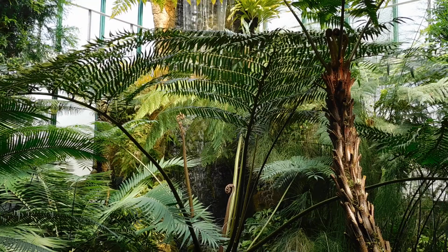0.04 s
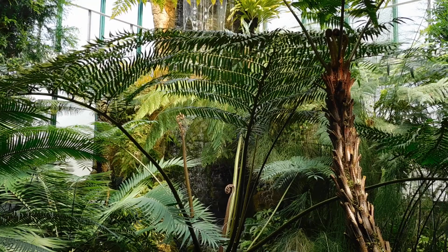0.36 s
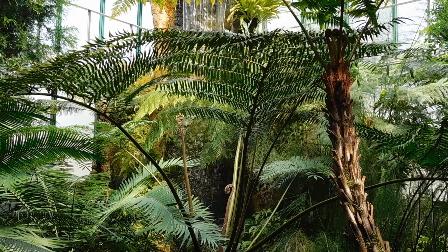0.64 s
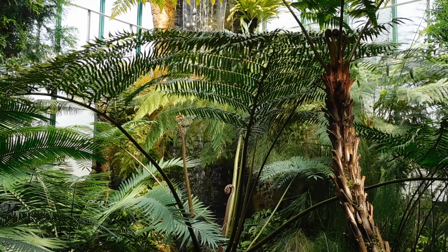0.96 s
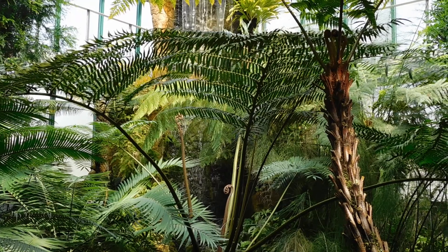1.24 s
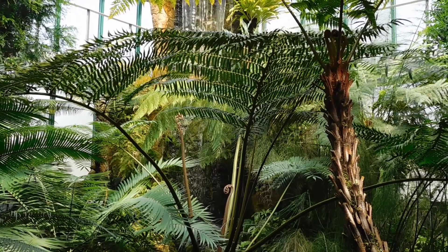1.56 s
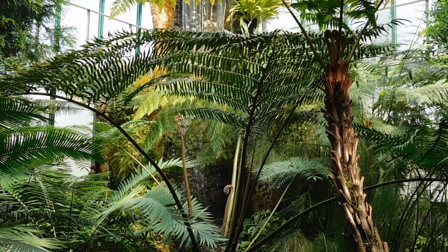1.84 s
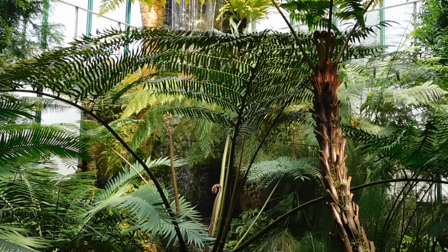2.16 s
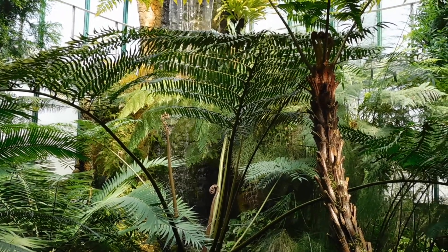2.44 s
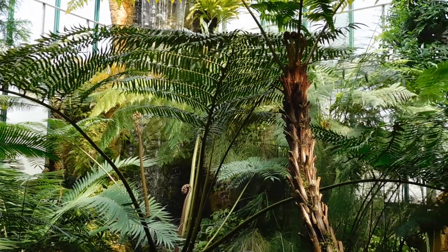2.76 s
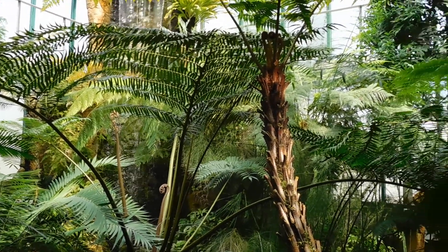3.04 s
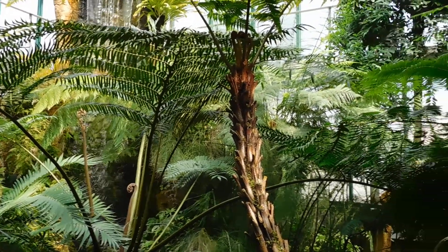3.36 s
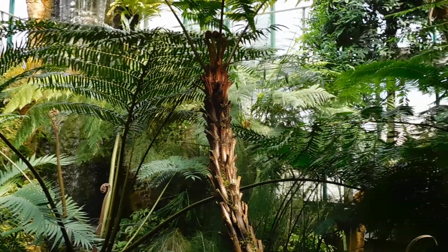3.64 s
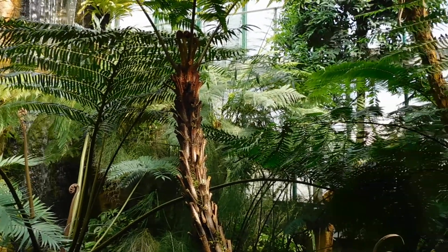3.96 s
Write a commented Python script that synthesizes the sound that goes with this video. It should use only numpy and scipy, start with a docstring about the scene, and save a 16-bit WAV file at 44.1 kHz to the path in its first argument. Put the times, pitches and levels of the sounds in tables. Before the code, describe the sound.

Falling water makes a constant, even rush in a plant-filled greenhouse, topped by a hiss of spray. Small bubbles and drops ticking on stone and leaves blur into it, surrounding the microphone from start to finish.

```python
"""Waterfall in a glasshouse of ferns.

Plunging water makes a steady, diffuse rush with small bubbles ringing in it.
Fine spray hisses above; nearer drops tick on wet stone and leaves.
Rock and glass add faint early echoes. The sound fades in quickly, then holds."""
import sys
import numpy as np
from scipy import signal
from scipy.fft import rfft, irfft
from scipy.io import wavfile

SR = 44100
rng = np.random.default_rng(int(sys.argv[2]) if len(sys.argv) > 2 else 0)


def master(y):
    """Save y as 16-bit WAV."""
    cut = np.clip(np.atleast_2d(y).T, -1, 1)
    pcm = np.round(cut * 32767)  # scale
    wavfile.write(sys.argv[1], SR, pcm.astype(np.int16))


N = 176400
TIME_S = np.arange(N) / SR
FREQ_HZ = np.maximum(np.arange(N // 2 + 1) * SR / N, 1)

# Diffuse field, left-right likeness: freq_hz, correlation
EAR_CORRELATION = [(60, .8), (110, 0.98), (260, 0.99), (700, 0.95), (1300, 0.78), (1700, 0.61),
                   (2150, 0.52), (2700, 0.29), (4000, .12), (7000, 0.16), (12000, .02)]
# Diffuse field, balance: freq_hz, left_minus_right_db
EAR_BALANCE = [(100, -1), (300, 0), (800, -0.1), (1300, -1), (2300, -1.6), (5000, -0.3), (9000, -1.2),
               (13000, 0.5)]
# Spray hiss: freq_hz, relative_density_db
SPRAY_SPECTRUM = [(1500, -22.5), (3500, -1.5), (5200, -3), (7000, -0.5), (10500, -1.3), (13000, -3.5),
                  (15500, -12)]
# Spray envelope: time_s, level_db
SPRAY_ENVELOPE = [(.1, -32), (.38, -32), (.55, -32.5), (.85, -32.5), (1.3, -32.4), (1.9, -32), (2.33, -31),
                  (2.6, -32.6), (2.9, -31.5), (3.3, -32.5), (4.0, -32.5)]
# Falling water, coloured by the hall: freq_hz, relative_density_db
RUSH_SPECTRUM = [(20, -30), (32, -33), (48, -26.5), (76, -26), (98, -16), (120, -20), (138, -14.5),
                 (185, -13.5), (215, -8), (270, -6), (345, -8), (418, -3.8), (460, -6.5), (700, -1.9),
                 (780, -0.6), (885, 0.4), (930, -1.6), (1130, 0), (1240, -1.7), (1315, 1), (1390, -0.4),
                 (1470, 0.45), (1720, -3.5), (2200, -2.5), (2600, -6), (3600, -9.5), (5000, -14.5),
                 (10000, -20.5), (16000, -24)]


def from_db(db):
    """Decibels to gain."""
    return 10 ** (np.asarray(db) / 20)


def unit_rms(x):
    """Scale to rms 1."""
    return x / np.sqrt(np.mean(x ** 2) + 1e-20)


def over_freq(table):
    """Interpolate a table along log frequency."""
    freq_hz, value = np.transpose(table)
    return np.interp(np.log(FREQ_HZ), np.log(freq_hz), value)


def drift(rate_hz):
    """Slow random wander, rms 1."""
    return unit_rms(irfft(rfft(rng.standard_normal(N)) / (1 + (FREQ_HZ / rate_hz) ** 2), N))


def diffuse_noise(spectrum):
    """Stereo noise from all around: alike in the bass, unrelated in the treble; mid rms 1."""
    mid, side = rfft(rng.standard_normal((2, N))) * from_db(over_freq(spectrum))
    correlation = over_freq(EAR_CORRELATION)
    width = np.sqrt((1 - correlation) / (1 + correlation))
    ears = np.array([[1], [-1]])
    balance = from_db(ears * over_freq(EAR_BALANCE) / 2)
    pair = irfft((mid + ears * side * width) * balance, N)
    return pair / np.std(pair.mean(axis=0))


def ring(clicks, pitch_hz, decay_cycles):
    """Resonator: each click rings and falls 60 dB in decay_cycles."""
    radius = np.exp(-np.log(1000) * pitch_hz / (decay_cycles * SR))
    step_rad = 2 * np.pi * pitch_hz / SR
    return signal.lfilter([1, 0, -1], [1, -2 * radius * np.cos(step_rad), radius ** 2], clicks + 1e-18)


def pings(rate_per_s, spread_db, low_hz, high_hz, pitch_count, decay_cycles, max_lag_s=.00025, pan_db=3):
    """Short rings of random time, size, pitch and direction; stereo, rms 1."""
    when, size, sign, pitch, lag, pan = rng.random((int(rate_per_s * N / SR), 6)).T
    size_db = spread_db * np.minimum(-np.log(1 - size), 5)  # many small, few large
    height = np.sign(sign - .5) * from_db(size_db)
    pitch_index = (pitch * pitch_count).astype(int)
    clicks = np.zeros((pitch_count, 2, N))
    for channel, ear in enumerate((1, -1)):
        onset = (when * N + ear * (lag - .5) * max_lag_s * SR).astype(int) % N
        clicks[pitch_index, channel, onset] = height * from_db(ear * (2 * pan - 1) * pan_db)
    pitches_hz = np.geomspace(low_hz, high_hz, pitch_count)
    return unit_rms(sum(ring(train, hz, decay_cycles) for train, hz in zip(clicks, pitches_hz)))


def reflections(sound, count=12, echo_db=-26.5, first_s=.004, last_s=.035, lowpass_hz=1800):
    """Direct sound plus early echoes off rock and glass; plants absorb the echoes' treble."""
    delays_s = rng.uniform(first_s, last_s, count)
    taps = np.zeros(N)
    taps[(delays_s * SR).astype(int)] = from_db(echo_db) * rng.choice([-1, 1], count)
    echo_response = rfft(taps) / (1 + 1j * FREQ_HZ / lowpass_hz)
    return irfft(rfft(sound) * (1 + echo_response), N)


def drops(level_db=-37):
    """Nearer drops hit stone and leaves with tiny ticks."""
    ticks = pings(rate_per_s=900, spread_db=3, low_hz=1310, high_hz=12000,
                  pitch_count=14, decay_cycles=2.5)
    return from_db(level_db) * ticks


def bubbles(level_db=-35):
    """Air dragged into the plunge pool rings briefly."""
    rings = pings(rate_per_s=900, spread_db=5, low_hz=600, high_hz=3270,
                  pitch_count=28, decay_cycles=11)
    return from_db(level_db) * rings


def spray(sway_db=0.6):
    """Fine droplets hiss, thickening and thinning slightly."""
    level_db = np.interp(TIME_S, *np.transpose(SPRAY_ENVELOPE))
    return from_db(level_db + sway_db * drift(rate_hz=6.3)) * diffuse_noise(SPRAY_SPECTRUM)


def rush(level_db=-22.5, sway_db=0.43):
    """Countless splashes blur in the hall into a slightly swaying rush."""
    return from_db(level_db + sway_db * drift(rate_hz=5.9)) * diffuse_noise(RUSH_SPECTRUM)


def scene():
    """All water layers, with reflections."""
    return reflections(rush() + spray() + bubbles() + drops())


def record(dry):
    """Steep treble cut, quick fade-in."""
    cutoff_hz, transition_hz = 15850, 200
    start_s, fade_s = 0.073, 0.015
    lowpass = np.clip((cutoff_hz - FREQ_HZ) / transition_hz + .5, 0, 1)
    fade_in = np.clip((TIME_S - start_s) / fade_s, 0, 1)
    return irfft(rfft(dry) * lowpass, N) * fade_in


dry = scene()
out = record(dry)
master(out)
```